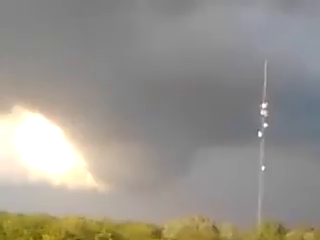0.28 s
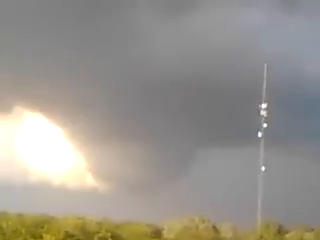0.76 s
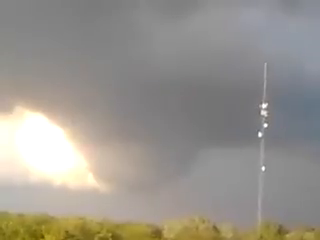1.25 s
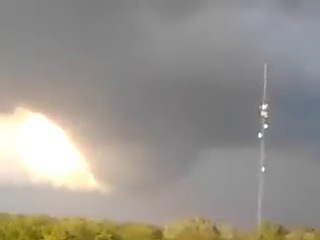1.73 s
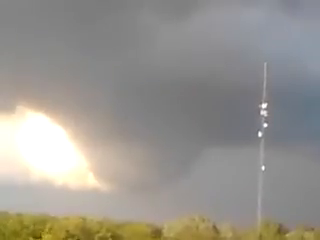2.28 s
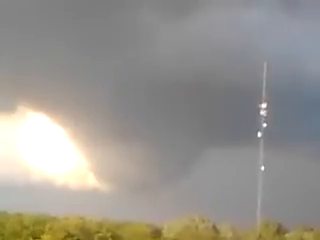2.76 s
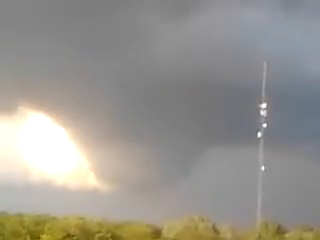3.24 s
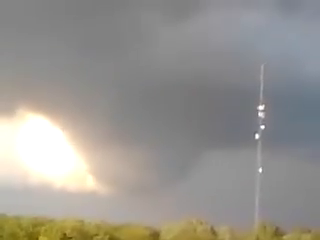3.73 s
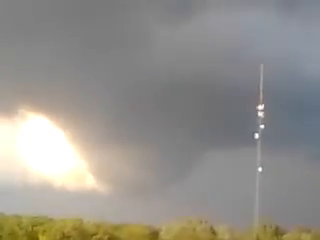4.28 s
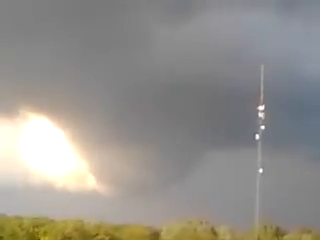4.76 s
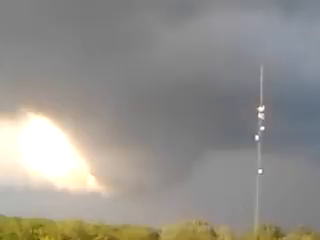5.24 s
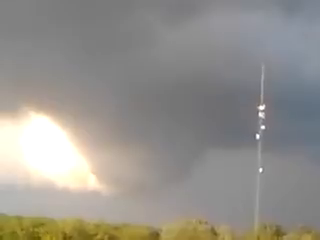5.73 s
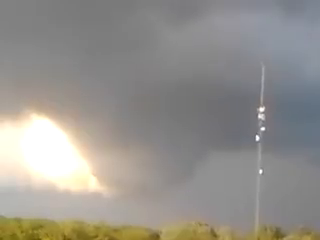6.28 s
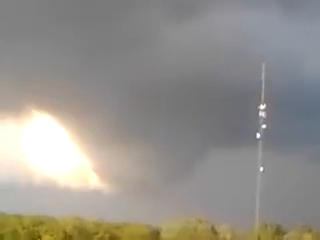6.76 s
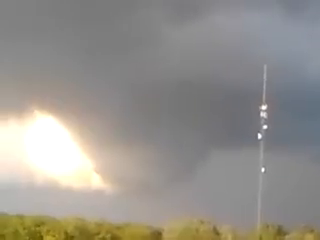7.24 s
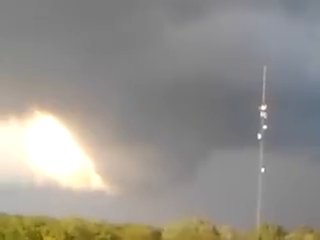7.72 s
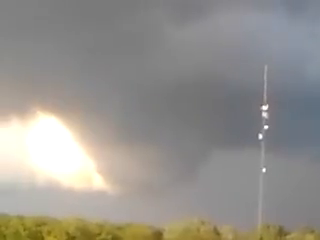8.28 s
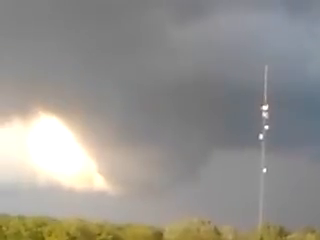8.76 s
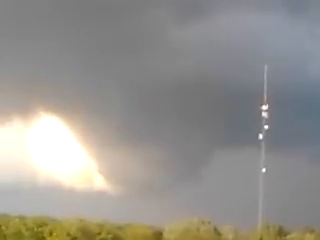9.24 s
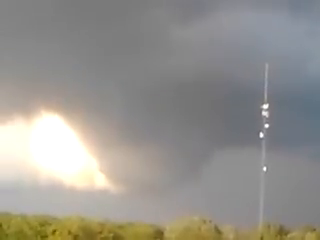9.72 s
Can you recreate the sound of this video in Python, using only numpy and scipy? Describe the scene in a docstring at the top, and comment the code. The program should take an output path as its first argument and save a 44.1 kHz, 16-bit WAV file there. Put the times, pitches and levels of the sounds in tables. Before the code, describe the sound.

Quick, high, evenly paced squeaks from a slipping fan belt, with a pulsing motor drone and faint distant traffic.

```python
"""A belt-driven fan chirps like a cricket outdoors. Its belt slips on the pulleys at the same spots
of every turn, rattling in step with the motor's hum; the metal rings and nearby walls echo.
The motor hums, sags once per belt turn and beats against the tone of its own shaft.
Air rushes, far traffic swells towards the end, and two soft bumps reach the microphone."""
import sys
import numpy as np
from scipy import signal
from scipy.fft import rfft, irfft, next_fast_len
from scipy.io import wavfile
from scipy.ndimage import uniform_filter1d, map_coordinates

SR = 44100
rng = np.random.default_rng(int(sys.argv[2]) if len(sys.argv) > 2 else 0)


def master_out(mix):
    """Clip the mix to full scale and print it as 16-bit PCM to the path in sys.argv[1]."""
    frames = np.transpose(np.atleast_2d(mix))
    ceiling = np.clip(frames, -1, 1)
    pcm = np.round(ceiling * 32767).astype(np.int16)
    wavfile.write(sys.argv[1], SR, pcm)


N = 440559
TIME = np.arange(N) / SR
HUM_HZ = 119.945  # the motor's magnetic hum
TURN_S, FIRST_TURN_S = 0.283697, -0.1415  # one belt turn; when its tight spot first meets the pulley


def amp(db):
    """Turn decibels into a gain."""
    return 10 ** (np.asarray(db) / 20)


def unit(x):
    """Scale a sound to an average power of 1."""
    return x / np.sqrt(np.mean(x ** 2) + 1e-20)


def wobble(rate):
    """A smooth random curve through `rate` new values a second."""
    return map_coordinates(rng.standard_normal(int(N * rate / SR) + 4), [TIME * rate])


def filtered(x, response):
    """Filter x; response(hz) gives the gain and phase at each frequency."""
    n = x.shape[-1]
    padded = next_fast_len(n + SR // 4)
    return irfft(rfft(x, padded) * response(np.fft.rfftfreq(padded, 1 / SR)), padded)[..., :n]


def add(track, start_s, sound):
    """Mix a sound into the track from start_s on."""
    start = round(start_s * SR)
    sound = sound[max(-start, 0):]
    part = track[max(start, 0):][:len(sound)]
    part += sound[:len(part)]


def rush(spectrum, patchy_db):
    """Noise shaped to a spectrum, with random louder and softer patches."""
    cells = signal.stft(rng.standard_normal(N), nperseg=1024)[2]
    patches = uniform_filter1d(rng.standard_normal(cells.shape), size=6, axis=0)
    patches = uniform_filter1d(patches, size=10, axis=1)
    noise = signal.istft(cells * amp(patchy_db * unit(patches)), nperseg=1024)[1][:N]
    points_hz, db = np.transpose(spectrum)
    return unit(filtered(noise, lambda hz: amp(np.interp(np.log(hz + 1), np.log(points_hz), db))))


def swelling(steady_db, swells):
    """A steady gain plus swells that rise and fall like something passing by."""
    power = sum(amp(db) ** 2 / (1 + ((TIME - s) / half_s) ** 2) ** 2 for s, half_s, db in swells)
    return np.sqrt(amp(steady_db) ** 2 + power)


# The tone colours of tyres. Each row: frequency in Hz, relative level in dB.
TYRE_ROAR = [(250, -14), (500, -7.5), (850, 2), (1020, -1.5), (1180, -2), (1380, -6), (1550, -17),
             (2500, -37)]
TYRE_HISS = [(900, -17), (1500, -1), (2200, -0.5), (2600, -3.5), (3500, -7), (5000, -21)]
# Passing vehicles. Each row: time when nearest in seconds, half length in seconds, roar in dB, hiss in dB.
VEHICLES = [(4.1, 0.66, -60, -66.5), (6.4, 0.49, -54.5, -63), (8.651, 0.62, -53, -60.5),
            (9.346, 0.25, -46.5, -51.5), (9.98, 0.59, -47.5, -56.5)]

def far_traffic():
    """Tyres roar and hiss on a far road, louder as each vehicle passes."""
    roar = swelling(-54, [(s, half_s, db) for s, half_s, db, _ in VEHICLES])
    hiss = swelling(-61.5, [(s, half_s, db) for s, half_s, _, db in VEHICLES])
    road = roar * rush(TYRE_ROAR, patchy_db=1) + hiss * rush(TYRE_HISS, patchy_db=1)
    return amp(0.86 * wobble(3.01)) * road


# The whirr's tone colour. Each row: frequency in Hz, relative level in dB.
WHIRR_SPECTRUM = [(2200, -27), (2550, -4.5), (2780, -2.5), (3100, -15), (3600, -21)]
# Its swells. Each row: peak time in seconds, half length in seconds, level in dB.
WHIRR_SWELLS = [(1.9, 0.35, -63), (6.2, 0.3, -63), (9.1, 1.2, -64)]

def far_whirr():
    """A thin, distant whirr comes and goes."""
    return swelling(-65.5, WHIRR_SWELLS) * rush(WHIRR_SPECTRUM, patchy_db=2.5)


# The tone colours of moving air. Each row: frequency in Hz, relative level in dB.
AIR_RUMBLE = [(120, -26), (165, 0), (195, -5.5), (245, 1), (310, -5), (420, -28)]
AIR_RUSH = [(20, -3.5), (32, -6.5), (48, -3.5), (85, -1), (115, -2.5), (160, -3.5), (200, -7.5), (250, -5),
            (320, -8.5), (380, -7.5), (420, -13.5), (480, -9), (560, -9.5), (800, -20.5), (1400, -35),
            (3000, -44)]
AIR_FIZZ = [(2000, -18.5), (3000, 0), (3750, -3), (4450, -2.5), (4950, 0), (5400, 1), (5750, 4),
            (6200, 0.5), (6900, -0.5), (7250, -9.5), (7500, -29.5)]

def air():
    """The fan's steady rush, a low rumble that slowly swells and sinks, and a fine fizz on top."""
    rumble = amp(-57 + 1.6 * wobble(2.8)) * rush(AIR_RUMBLE, patchy_db=2)
    flow = amp(-46.5 + 0.42 * wobble(4.4)) * rush(AIR_RUSH, patchy_db=1.5)
    fizz = amp(-57) * rush(AIR_FIZZ, patchy_db=2.5)
    return flow + rumble + fizz


# Knocks. Each row: time in seconds, strength in dB.
BUMPS = [(1.081, -35), (5.619, -33.5)]

def bumps(pitch_hz=85, fade_s=0.17, rise_s=0.0086):
    """Soft, low knocks on the body that holds the microphone."""
    out, t = np.zeros(N), np.arange(SR // 4) / SR
    thud = (1 - np.exp(-t / rise_s)) * np.sin(2 * np.pi * pitch_hz * t)
    for s, db in BUMPS:
        add(out, s - .008, amp(db + 6 - 60 * t / fade_s) * thud)
    return out


# The shaft's tones. Each row: multiple of the spin rate, base level in dB.
SHAFT_TONES = [(1, -52.5), (3, -62), (4, -63), (5, -65), (6, -63.5), (7, -70)]
# Their slow drift in loudness. Each row: time in seconds, change in dB.
SHAFT_DRIFT = [(0.2, -0.5), (1.4, -3.5), (3.6, 0.5), (6.7, 2), (9.8, 0.5)]

def motor(shaft_hz=59.284, blower_hz=74.5, whine_hz=1191.5, sag_s=0.0027, dip_db=-10, crest_s=.25):
    """The hum lags, then dips, as the belt's tight spot passes; twice the shaft rate beats against it."""
    def tight_spot(delay_s, width_s):
        away_s = (TIME - FIRST_TURN_S - delay_s + TURN_S / 2) % TURN_S - TURN_S / 2
        return np.exp(-(away_s / width_s) ** 2)

    lag = sag_s * tight_spot(0.016, .042)
    hum_gain = amp(-42.5 + dip_db * tight_spot(0.065, 0.024) + 0.86 * wobble(14))
    hum = hum_gain * np.sin(2 * np.pi * HUM_HZ * (TIME - lag + lag.mean()) + 0.19 * wobble(16))
    beat_cycles = 2 * shaft_hz * (TIME - crest_s) + HUM_HZ * crest_s  # lines up with the hum at crest_s
    beat = amp(-46 + 1.4 * wobble(8.2)) * np.sin(2 * np.pi * beat_cycles)
    shaft = np.zeros(N)
    for multiple, db in SHAFT_TONES:
        cycles = round(multiple) * shaft_hz * TIME + rng.random()
        shaft += amp(db) * np.sin(2 * np.pi * cycles + 0.093 * multiple * wobble(4.6))
    shaft *= amp(np.interp(TIME, *np.transpose(SHAFT_DRIFT)))
    blower = amp(-61) * np.sin(2 * np.pi * blower_hz * TIME)
    whine = amp(-74 + 2.8 * wobble(4)) * np.sin(2 * np.pi * whine_hz * TIME + wobble(12))
    return np.sqrt(2) * (amp(-2.5) * (hum + beat) + shaft + blower + whine)


# Echoes off nearby walls. Each row: delay in seconds, relative level in dB.
WALL_ECHOES = [(0.023, -13), (.046, -14.5), (.082, -19), (0.099, -15)]

def wall_echoes(chirp, tail_s, tail_db):
    """Walls echo a chirp, and scattered sound trails it, fading by 60 dB in tail_s."""
    t = np.arange(len(chirp)) / SR
    tail = rng.standard_normal(len(t)) * amp(-60 * t / tail_s)
    echoes = amp(tail_db) * tail / np.linalg.norm(tail)
    for delay, db in WALL_ECHOES:
        add(echoes, delay + rng.normal(0, .0002), amp([db]))
    return chirp + signal.fftconvolve(chirp, echoes)[:len(t)]


# The notes at which the metal rings. Each row: pitch in Hz, width in Hz, relative level in dB.
METAL_RINGS = [(3985, 50, -1), (4089, 14, 5), (4133, 14, 5), (4206, 22, 0), (4365, 25, -1), (4443, 10, 11),
               (4484, 12, 5), (5312, 20, 5), (5395, 12, 7), (5428, 10, 8), (5565, 16, 10), (5668, 20, 4),
               (5758, 6, 8)]

def housing(hz):
    """A filter: the direct sound plus the ringing of pulleys and sheet metal."""
    return 1 + sum(amp(db) * 1j * hz * width / (pitch ** 2 - hz ** 2 + 1j * hz * width)
                   for pitch, width, db in METAL_RINGS)


def pulley_ring(pitch_hz=4445, spread_hz=40, level_db=-70.5):
    """The running belt keeps the pulley faintly ringing, even between squeaks."""
    rub = lambda hz: housing(hz) / (1 + ((hz - pitch_hz) / spread_hz) ** 2)
    return amp(level_db) * unit(filtered(rng.standard_normal(N), rub))


def motor_jerks(t, depth_db, bite_s, first_peak_s=.0048):
    """A slip's gain at times t: each pulse of the hum jerks the belt for bite_s, then lets go."""
    age = (t - first_peak_s + bite_s) % (1 / HUM_HZ) / bite_s
    floor = amp(-depth_db)
    return floor + (1 - floor) * (age * np.exp(1 - age)) ** 2


def slips(length_s, pitch_hz, spread_hz, rise_hz_per_s, edge_s, steady, jerks):
    """One slip per turn: the belt sticks and slides, making a rough tone that rings the housing."""
    t = np.arange(jerks.shape[1]) / SR
    band = lambda hz: 1 / (1 + ((hz - pitch_hz) / spread_hz / 2) ** 2) ** 2
    glide = np.exp(1j * np.pi * rise_hz_per_s * (t - length_s / 2) ** 2)
    rough = signal.hilbert(filtered(rng.standard_normal(jerks.shape), band)) * glide
    tone = rough.real / np.abs(rough) ** steady  # friction limits the swing; steady=1 evens it out
    grip = np.clip(t / edge_s, 0, 1) * np.clip((length_s + edge_s - t) / edge_s, 0, 1)
    ringing = filtered(tone * grip * jerks, housing)
    return ringing / np.sqrt(np.sum(ringing ** 2, axis=1, keepdims=True) / (length_s * SR))


def squeak(parts, times, changes_db, edge_s, steady, rattle_db, bite_s, tail_s, tail_db):
    """One kind of squeak, turn after turn: its slips join into a chirp that the walls echo."""
    lead_s, scatter_s = .02, .0012  # room for early slips; chance in the timing
    t = np.arange(SR // 4) / SR
    times = times + scatter_s * rng.standard_normal(len(times))
    chirps, out = np.zeros((len(times), SR // 2)), np.zeros(N)
    for delay, length, pitch, spread, rise, db in parts:
        jerks = motor_jerks(times[:, None] + delay + t, rattle_db, bite_s)
        for chirp, slip in zip(chirps, slips(length, pitch, spread, rise, edge_s, steady, jerks)):
            add(chirp, lead_s + delay, amp(db) * slip)
    echoed = np.array([wall_echoes(chirp, tail_s, tail_db) for chirp in chirps])
    usual_level = np.std(echoed)
    for s, db, chirp in zip(times, changes_db, echoed):
        add(out, s - lead_s, amp(db) * usual_level * unit(chirp))
    return out


# The slips that make up each kind of squeak. Each row: delay in seconds, length in seconds,
# pitch in Hz, pitch spread in Hz, pitch rise in Hz per second, usual level in dB.
FIRST_SLIPS = [(-.008, 0.0061, 4130, 90, 0, -56), (-.002, 0.026, 4060, 71.8, 0, -46.5),
               (-.001, 0.033, 4500, 70, 0, -47.5)]
RASP_SLIPS = [(-.002, .019, 5310, 110, 5000, -49), (.014, .019, 5480, 160, 7001, -48),
              (.020, .006, 5480, 120, 0.5, -46), (.007, .030, 5930, 250, 0.5, -53.5),
              (.036, .032, 5420, 120, -0.5, -52), (0.014, 0.036, 4400, 130, 0, -59.5),
              (-.008, 0.054, 6300, 610, 1, -64.5)]
CREAK_SLIPS = [(.040, .019, 2975, 100, 0.00053, -58)]
UNDERTONE_SLIPS = [(-.003, .028, 4122, 36, 0, -51), (0, 0.036, 6680, 290, 0.0052, -64.5)]
ANSWER_SLIPS = [(-.004, .015, 4448, 24, 0.0017, -46.5), (.016, .016, 4448, 18, 0.0023, -45)]
# The belt's turns. Each row: start of the answer in seconds, then how much louder than usual
# the first squeak, the rasp and the answer are, in dB.
BELT_TURNS = [(-0.036, 3.5, -0.5, 2), (0.254, -0.5, -1.5, -0.5), (0.526, 1.5, -5.5, 2),
              (0.808, 0.0, -1, 1.5), (1.083, -1.5, -0.5, -1.5), (1.364, -1.5, 1.5, -1),
              (1.652, -2.5, -1.5, -0.5), (1.929, 0.5, 3.0, 1.0), (2.208, 0, 3, 0.5), (2.489, 0, 1, 2),
              (2.775, 0.5, 1.5, 1.5), (3.057, -0.5, -0.5, 4.5), (3.346, 0, 2.5, 1.5), (3.627, 0, 2, 0.0),
              (3.922, 0, -2.0, -8), (4.209, -1.0, 0, -3), (4.487, -2.0, -1.5, 2.5), (4.769, -3, -2.0, 3),
              (5.062, -1.0, 1.5, -1.5), (5.346, 0, 2.5, -3.5), (5.618, -1, 3, 0), (5.909, -0.5, 1, 0),
              (6.193, 2.5, -2.5, -0.5), (6.472, 0, 3, -3), (6.751, 0, 1, 4), (7.037, 0.5, 2.5, 2),
              (7.328, 1, 2, -1), (7.621, 1.5, 1.0, 1.5), (7.895, 0.5, -4, -1.5), (8.183, -0.5, -1.5, 2.5),
              (8.466, 0, -2, 2), (8.758, -1.0, -1.0, -4.5), (9.024, 0, 0.0, -2.5), (9.326, 1, -3, 0.5),
              (9.607, 0.5, 0.5, -2.5), (9.885, 0.5, -2.5, 1.5)]

def belt(rasp_delay_s=0.0105):
    """Each turn: a rough squeak, a rising rasp, a faint creak, then a purer answer with an undertone."""
    answer_s, first_db, rasp_db, answer_db = np.transpose(BELT_TURNS)
    turn_starts = FIRST_TURN_S + TURN_S * np.arange(len(BELT_TURNS))
    even = np.zeros(len(BELT_TURNS))
    first = squeak(FIRST_SLIPS, turn_starts, first_db,
                   edge_s=.006, steady=.7, rattle_db=6.5, bite_s=.0022, tail_s=.44, tail_db=-10)
    rasp = squeak(RASP_SLIPS, turn_starts + rasp_delay_s, rasp_db,
                  edge_s=.004, steady=.33, rattle_db=8.5, bite_s=.002, tail_s=.28, tail_db=-9.5)
    creak = squeak(CREAK_SLIPS, turn_starts, even,
                   edge_s=.0067, steady=.43, rattle_db=16, bite_s=.0011, tail_s=.3, tail_db=-11.5)
    undertone = squeak(UNDERTONE_SLIPS, answer_s, even,
                       edge_s=.005, steady=.97, rattle_db=2, bite_s=.0024, tail_s=.29, tail_db=-12)
    answer = squeak(ANSWER_SLIPS, answer_s, answer_db,
                    edge_s=.006, steady=.98, rattle_db=.5, bite_s=.0022, tail_s=.4, tail_db=-14)
    return first + rasp + creak + answer + undertone


def scene():
    """The fan and its surroundings, mixed into one channel."""
    fan = belt() + pulley_ring() + motor() + air()
    return (fan + far_traffic() + far_whirr() + bumps())[None]


def record(dry, top_hz=7350):
    """The microphone keeps nothing above top_hz."""
    return filtered(dry, lambda hz: hz < top_hz)


dry = scene()
out = record(dry)
master_out(out)
```